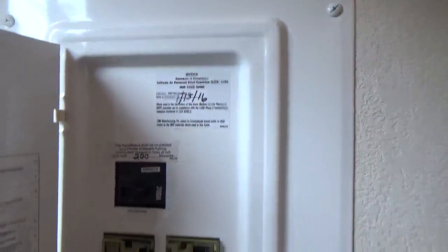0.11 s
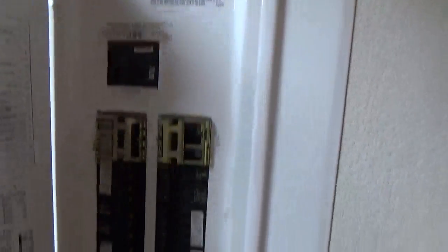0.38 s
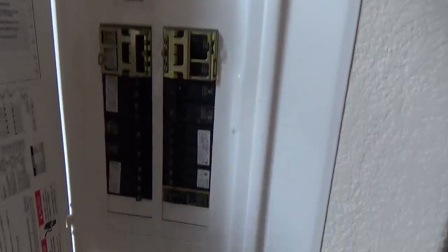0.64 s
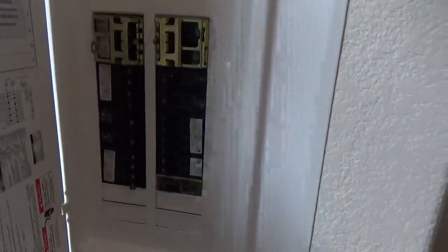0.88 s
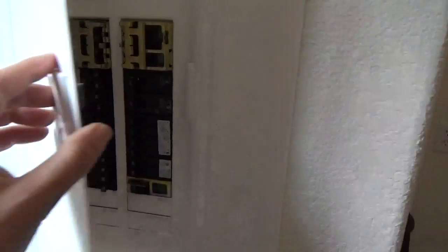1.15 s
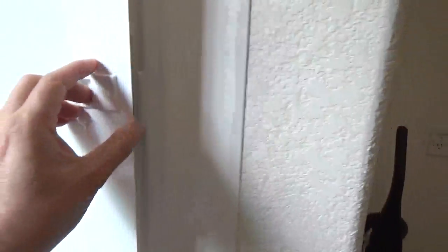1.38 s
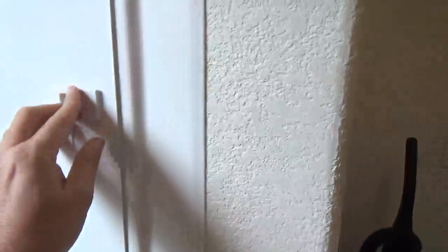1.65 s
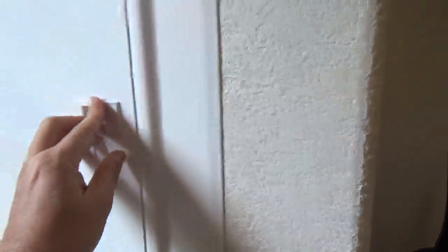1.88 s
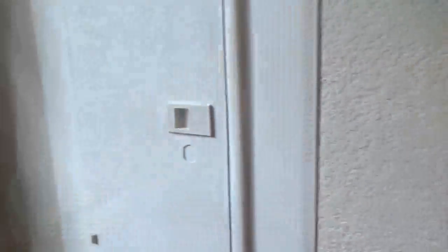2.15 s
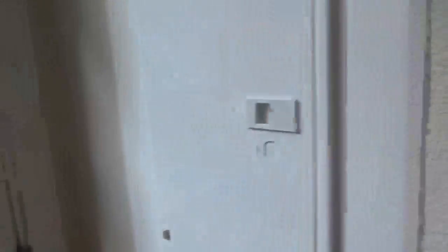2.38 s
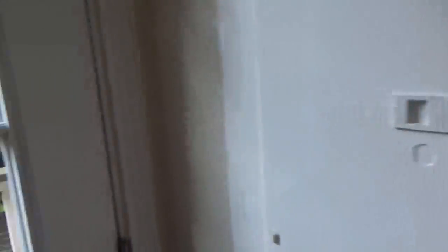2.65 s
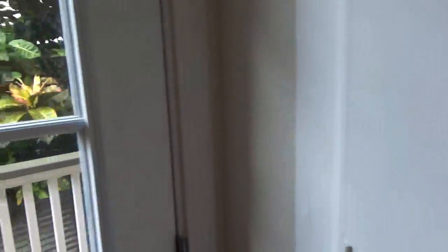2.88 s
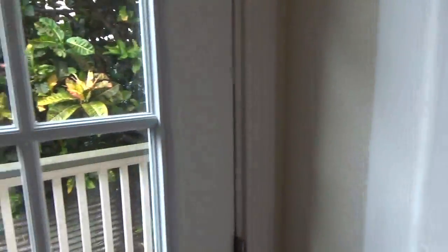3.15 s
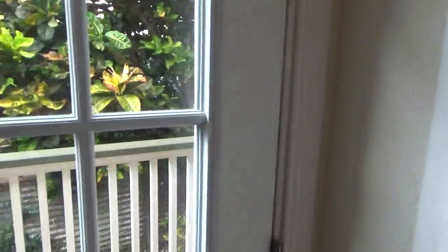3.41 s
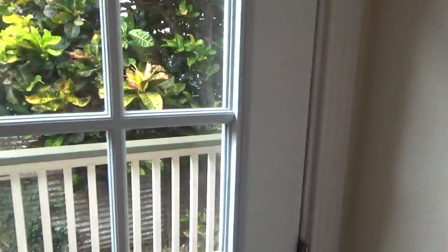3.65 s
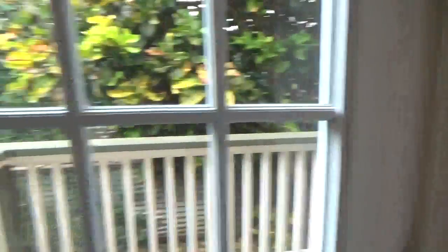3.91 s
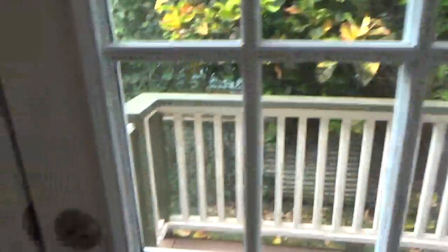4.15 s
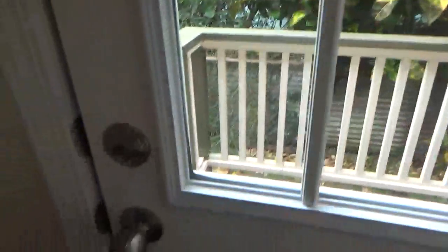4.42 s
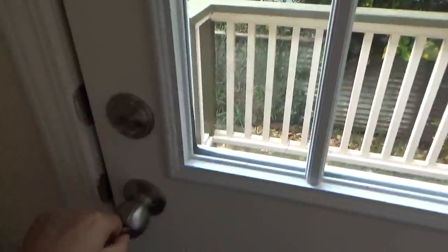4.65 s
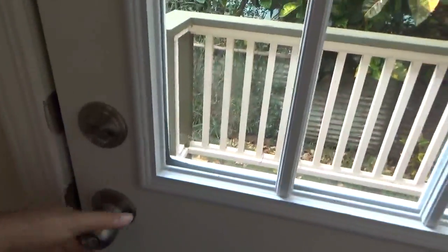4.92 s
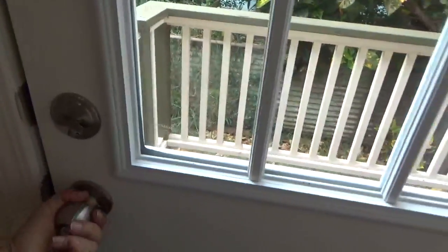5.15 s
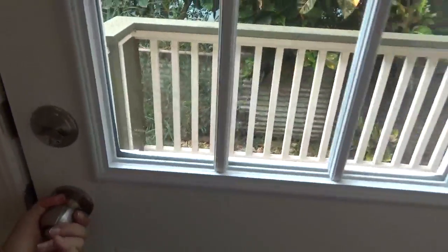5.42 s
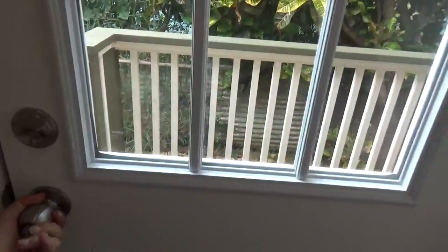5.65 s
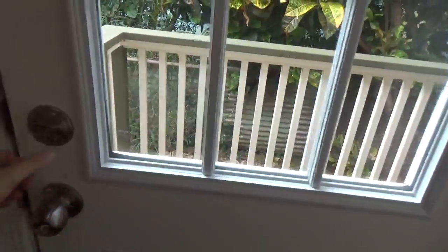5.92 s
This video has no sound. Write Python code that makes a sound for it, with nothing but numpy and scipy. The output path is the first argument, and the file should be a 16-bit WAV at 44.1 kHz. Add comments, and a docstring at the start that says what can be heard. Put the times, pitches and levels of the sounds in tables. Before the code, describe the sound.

A small hard-walled hall, heard close up in stereo with a short, bright room tail over low hiss, faint mains hum and rustling clothes. A tiny snap comes at 0.3 s, then a soft brushing and flexing of sheet metal around 0.9-1.3 s. From 1.55 to 2.0 s the panel's catch scrapes shut: rough rasp, short squeal, tinny clanks and snaps, slightly left. Rustle and very thin, faint squeaks follow at 2.4-2.7 s. Soft, irregular shoe slaps and scuffs on hard floor run from 2.7 to 4.05 s. At 4.25 s knob and latch begin ticking, clattering in clusters to 5.0 s, then a loud burst at 5.1-5.25 s with wooden thud, drag and shudder. A near-quiet gap holds a faint squeak at 5.35 s and a light click at 5.5 s. The loudest sharp clacks come at 5.7-5.85 s, with a brief scrape dying away by 6 s.

```python
"""Panel door, footsteps, latch

In a small hall a sheet-metal panel door is swung to and its catch scraped shut: rough slip noise and short
snaps excite the modes of the sheet. Feet shuffle to a wooden door as slaps and scuffs on a hard floor. Its knob
and latch click and clatter as the door is pulled and pushed: short blows ring metal and leaf, rubbing drags the
leaf. Thin squeaks are wavering sines; hard walls add early echoes and a short noise tail.
Mains hum, hiss and rustling clothes lie underneath."""
import sys
import numpy as np
from scipy import signal
from scipy.fft import rfft, irfft, next_fast_len
from scipy.io import wavfile
from scipy.ndimage import uniform_filter1d

SR = 44100
rng = np.random.default_rng(int(sys.argv[2]) if len(sys.argv) > 2 else 0)


def transcribe(signal):
    """Save signal, clipped to [-1, 1], as a 16-bit WAV file at the path in sys.argv[1]."""
    frames = np.atleast_2d(signal).T
    limited = np.clip(frames, -1, 1)
    pcm = np.round(limited * 32767).astype(np.int16)
    wavfile.write(sys.argv[1], SR, pcm)


def makeup_ratio(level_db):
    """Linear amplitude ratio for a level in decibels (20 dB per factor of ten)."""
    decades = np.asarray(level_db, float) / 20
    return 10 ** decades


N = 266364  # samples
T = np.arange(N) / SR  # s


def on_log(table, hz):
    """Read a (f/Hz, value) table along log frequency."""
    f, v = np.transpose(table)
    return np.interp(np.log(hz + 1), np.log(f), v)


def coloured(x, table):
    """Shape the spectrum of a signal by a (f/Hz, level/dB) table."""
    size = next_fast_len(x.shape[-1])
    hz = np.arange(size // 2 + 1) * SR / size
    return irfft(rfft(x, size) * makeup_ratio(on_log(table, hz)), size)[..., :x.shape[-1]]


def unit(x):
    """Scale to energy 1, so that a filter keeps the level of white noise."""
    return x / np.sqrt(np.sum(x ** 2))


def place(x, pan_db):
    """Pan mono to stereo by the level of left over right."""
    return x * makeup_ratio(np.array([[pan_db], [-pan_db]]) / 2)


def band(lo_hz, hi_hz):
    """Response of a broad band: the many close modes that blur together."""
    sos = signal.butter(2, [lo_hz, hi_hz], "band", fs=SR, output="sos")
    return unit(signal.sosfilt(sos, signal.unit_impulse(SR // 8)))


def ring(modes, blur=0.):
    """Response of decaying modes over a weighted broad band; little radiates far below the lowest mode."""
    hz, width, db = np.transpose(modes)[:, :, None]
    t = T[:SR // 8]
    decay = np.exp(-np.pi * width * t)  # a wider mode dies sooner
    out = np.sum(makeup_ratio(db) * width * decay * np.sin(2 * np.pi * hz * t), axis=0)
    out = signal.sosfilt(signal.butter(2, 0.77 * hz.min(), "high", fs=SR, output="sos"), out)
    return unit(unit(out) + blur)


def walk(rate):
    """Random levels held for 1 / rate s and smoothed twice, with a standard deviation of 1."""
    k = int(SR / rate)
    held = np.repeat(rng.standard_normal(N // k + 1), k)
    w = uniform_filter1d(uniform_filter1d(held, k), k)[:N]
    return w / w.std()


def grit(spread_db):
    """Contact force: a dense stream of tiny slips, a few much larger than the rest."""
    size = np.minimum(rng.exponential(size=N), 6.0)
    g = rng.standard_normal(N) * makeup_ratio(spread_db * size)
    return g / np.sqrt(np.mean(g ** 2))


def blows(columns, parts, rise_s, body_stretch, favour, spread_db):
    """Blows rise quickly and rattle out; the spot that is hit favours modes near its own pitch."""
    out, force = np.zeros(N + SR), grit(spread_db)
    t = T[:SR // 5]
    for s, db, click_hz, body_db, body_hz, sizzle_db, decay in np.broadcast(*columns):
        at = int(s * SR)
        grain = np.take(force, at + np.arange(len(t)), mode="wrap")
        decays = max(decay, .0005) * np.array([1, body_stretch, 1])  # the heavy body shakes on longer
        levels_db, pitches_hz = (0, body_db, sizzle_db), (click_hz, body_hz, None)
        for part, rel_db, hz, boost, fall in zip(parts, levels_db, pitches_hz, (*favour, 0), decays):
            if hz:
                peak = signal.lfilter(*signal.iirpeak(hz, 3.5, fs=SR), part)
                part = unit(part + boost * unit(peak))
            shape = (1 - np.exp(-t / rise_s)) * np.exp(-t / fall)
            y = signal.fftconvolve(shape * grain, part)
            # the blow's energy is set, its grain is chance
            y = makeup_ratio(db + rel_db) * np.sqrt(np.sum(shape ** 2)) * unit(y)
            out[at:at + len(y)] += y
    return out[:N]


def rubs(tables, shares, parts, tones_hz, spread_db):
    """Contact level and one control drive rough parts and wavering sines; the last sine has its own level."""
    force = np.zeros((len(parts) + len(tones_hz), N))
    for table in tables:
        s, db, control_db, last_db = np.transpose(table)
        eased_db = db.max() - db
        layers_db = [base + slope * control_db + lasting * eased_db for base, slope, lasting in shares]
        for layer, rel_db in enumerate(layers_db + [last_db]):
            force[layer] += makeup_ratio(np.interp(T, s, db + rel_db, left=-120, right=-120))
    rough = [signal.oaconvolve(f * grit(spread_db), r)[:N] for f, r in zip(force, parts)]
    soft = uniform_filter1d(force[len(parts):], SR // 100) * np.sqrt(2)
    tones = []
    for f, hz in zip(soft, tones_hz):
        level = f * makeup_ratio(2.1 * walk(70))
        wavering_hz = hz + 0.4 * np.sqrt(hz) * walk(40)
        tones.append(level * np.sin(2 * np.pi * np.cumsum(wavering_hz) / SR))
    return rough + tones


# catch snapping on the panel: (t/s, click level/dB, sheet/dB re click, sizzle/dB re click, rattle decay/s)
PANEL_SNAPS = [(0.2945, -52, -12, -6, .0012), (0.2998, -33.5, -21, -7, 0.0017),
               (1.054, -52.5, -8, 10, .0071), (1.13, -59, 0, 18, .006), (1.5554, -18, -15, -3, 0.0027),
               (1.563, -30, 1, 11.5, 0.014), (1.6317, -27, 9.5, 8.5, 0.016), (1.6976, -21, 5, -14, 0.0052),
               (1.7178, -19, -16, 11, .001), (1.745, -21, -28, 3.5, 0.014),
               (1.7947, -24, -0.5, -13, 0.0034), (2.001, -39, 3, -15, 0.0044)]
# panel swung to, then catch scraped shut and settling:
# (t/s, rasp level/dB, squeal/dB re rasp, flexing/dB re rasp)
PANEL_SCRAPES = [
    [(0.93, -62.5, -10, -6), (1.068, -57, -7, 5), (1.158, -59.5, -1, 15.5), (1.19, -58.5, -6, 8),
     (1.226, -58, -6, 17), (1.33, -68.5, -6, -3.5)],
    [(1.555, -42, -18, -16), (1.575, -28.5, 9, -6), (1.623, -28, -0.5, 1), (1.681, -32, 3, 11),
     (1.703, -26.5, 0, -7), (1.72, -29, 4.5, 3), (1.742, -23, -4.5, -22), (1.792, -19.5, -10, -4.5),
     (1.844, -27, -1.5, -18), (1.878, -37.5, 1, -12), (1.92, -44, -7, -12), (1.98, -53.5, -4, -8),
     (2.0, -43, -4, -2), (2.058, -55, -3.5, 8), (2.126, -62, -18, 0), (2.2, -77.5, 0, 1)],
]
# layers that the squeal wakes, in rows: rasp, sheet, sizzle, clank, three singing modes
# (level/dB re rasp, slope/dB per dB of squeal, slope/dB per dB that the contact eases)
PANEL_LAYERS = [(-0.5, 0, 0), (-5, 0.4, 0.0516), (0, 0.91, -0.0136), (-3, 0.05, 0.2947), (-2, 1, -0.17),
                (-11, 0.95, -0.0223), (-13, 0.5, 0.3166)]
# modes of the sheet: (f/Hz, width/Hz, level/dB)
SHEET_MODES = [(347, 48, -13), (606, 31, -11), (720, 116, 8.5), (1186, 30, 5.5), (1287, 58, 5)]
# modes of the catch's bright ring: (f/Hz, width/Hz, level/dB)
CATCH_MODES = [(1840, 100, 19.3), (2330, 120, 16), (2423, 110, 14), (3350, 210, 5.4), (4640, 100, 10),
               (5400, 280, 11), (5800, 53, 14)]
# modes that the scraping catch sets singing: (f/Hz)
SINGING_MODES = [721, 1245, 6440]


def panel():
    """Sheet-metal door: the catch scrapes and snaps, the sheet rings, sings and flexes."""
    catch_hz, sheet_hz, flex_hz = 2530, 680, 169.7  # modes nearest the catch; flexing of the sheet
    catch_seats_s, seated_db = 1.71, -18
    catch = ring(CATCH_MODES, 3.1 * band(960, 6000))
    sheet = ring(SHEET_MODES, 0.11 * band(170, 1050))
    parts = catch, sheet, band(8560, 12640)
    rasp, body, sizzle, clank, *sing, flex = rubs(
        PANEL_SCRAPES, PANEL_LAYERS, (*parts, band(120, 860)), [*SINGING_MODES, flex_hz], spread_db=3.5)
    # once the catch seats, it damps the highest singing mode
    sing[-1] = sing[-1] * np.where(T < catch_seats_s, 1, makeup_ratio(seated_db))
    s, db, sheet_db, sizzle_db, decay = np.transpose(PANEL_SNAPS)
    snaps = blows((s, db, catch_hz, sheet_db, sheet_hz, sizzle_db, decay), parts,
                  rise_s=0.00021, body_stretch=1.95, favour=(1.9, .6), spread_db=4.0)
    # the wide sheet hangs to the left of the catch
    return place(rasp + sizzle + snaps, 1.6) + place(body + clank + sum(sing), 3.9) + place(flex, 3.5)


# knob and latch: (t/s, click level/dB, click f/Hz, leaf/dB re click, sizzle/dB re click)
LATCH_CLICKS = [(4.2633, -35.5, 1410, -7, -2.5), (4.368, -39, 3500, 2, -4), (4.3819, -27, 3580, -12.5, 2.5),
                (4.4, -30.5, 1380, -16, -11), (4.502, -36, 1750, -11, -14), (4.5098, -31, 1850, -22, -11),
                (4.516, -29, 1400, -14.5, -10), (4.5505, -29, 3030, -21, -10),
                (4.5564, -26.5, 1510, -7.5, -1), (4.5663, -20.5, 3450, -14.5, 2.5),
                (4.585, -51, 1400, 0, -13), (4.6464, -47, 3520, -7, -7), (4.7255, -31.5, 2590, -12, 3.5),
                (4.7323, -16.5, 2960, -19, -4.5), (4.737, -34, 2390, 1.3, -14.5),
                (4.809, -27, 3960, -10.5, -7), (4.968, -35, 2000, -3, -0.5),
                (4.975, -17.5, 2240, -31, -0.5), (4.9795, -17.5, 4030, -5, -0.5),
                (4.987, -22.5, 3860, -21, 4), (5.0718, -23.5, 1880, -8.5, -7),
                (5.116, -26.5, 1640, -24, -12), (5.127, -23, 1610, -6.5, -2), (5.139, -13, 1670, -8, -4),
                (5.502, -26.5, 1700, -13, -2), (5.5598, -43.5, 1840, -1, 4),
                (5.7212, -21, 3570, -37.5, -10), (5.7254, -17, 3000, -23, -13),
                (5.7294, -22, 3570, -13, -3.5), (5.734, -25, 1440, -34, -12),
                (5.7777, -16.5, 3300, -33, -7.5), (5.7832, -18, 3500, -28, -3.5),
                (5.7975, -12.5, 1670, -19, -6.5), (5.8034, -12, 1700, -20, -16),
                (5.8338, -11.5, 5220, -24, -6.5), (5.847, -25.5, 1920, 1, -11)]
# latch spring ticking, short: (t/s, click level/dB, click f/Hz, sizzle/dB re click)
SPRING_CLICKS = [(4.9305, -27.5, 2380, -6.5), (5.1125, -37, 5200, 5), (5.134, -14, 3000, -3),
                 (5.1618, -7.5, 3600, -20), (5.1757, -10, 3900, -18), (5.2607, -17.5, 4400, -9),
                 (5.714, -37.5, 4200, -2)]
# door dragging in its frame, pulled, then pushed:
# (t/s, rasp level/dB, swing of the leaf/dB re rasp, shudder/dB re rasp)
DOOR_DRAGS = [
    [(5.11, -42.5, 5, -7), (5.136, -25, -15, -25), (5.168, -26.5, -2, -13), (5.188, -31, -4, 6.5),
     (5.215, -30, 1, 7), (5.24, -42.5, 4, 9), (5.288, -47.5, 12, 3), (5.344, -52, -5, -12),
     (5.384, -63, 4, -13), (5.412, -56, 6, -5.5), (5.48, -62, -2, -6)],
    [(5.775, -43, -54, -30), (5.811, -22, -50, -30), (5.83, -23.5, -45, -22), (5.85, -27, -46, -9),
     (5.875, -31.5, -47, -14), (5.9, -47, -32, -11), (5.918, -46, -28, -11), (5.976, -62, -30, -4),
     (6.03, -64, -28, -5)],
]
# layers that the swing wakes, in rows: rasp, leaf, sizzle, rumble, air thump
# (level/dB re rasp, slope/dB per dB of swing, slope/dB per dB that the contact eases)
DOOR_LAYERS = [(-2, 0, 0), (3, 0.05, 0.0837), (-8.5, -0.06, 0.17), (3, 0.75, -0.13), (-3, 1.5, 0.27)]
# modes of the wooden leaf: (f/Hz, width/Hz, level/dB)
LEAF_MODES = [(167, 5.8, 0), (291, 21, 8.5), (400.4, 17, 7), (390, 570, 1), (900, 420, -1.5)]
# modes of the metal latch: (f/Hz, width/Hz, level/dB)
LATCH_MODES = [(1595, 490, 16.5), (2630, 340, -32), (3300, 48, -10), (3986, 150, 9), (5220, 660, 6.5)]


def door():
    """Knob and latch tick and clatter into the wooden leaf, which drags, shudders and pushes air."""
    thump_hz, shudder_hz = 21.9, 155  # air and leaf
    leaf_per_click = .21  # a harder contact wakes higher modes in latch and leaf alike
    latch_rattle_s, tick_rattle_s, tick_leaf_db = .0038, .0012, -16.5
    latch = ring(LATCH_MODES, 2.45 * band(1250, 4380))
    leaf = ring(LEAF_MODES, 1.3 * band(70, 1230))
    parts = latch, leaf, band(7000, 13800)
    *drag, rumble, thump, shudder = rubs(
        DOOR_DRAGS, DOOR_LAYERS, (*parts, band(52, 106)), [thump_hz, shudder_hz], spread_db=3.0)
    s, db, click_hz, leaf_db, sizzle_db = np.transpose(LATCH_CLICKS)
    clatter = blows((s, db, click_hz, leaf_db, leaf_per_click * click_hz, sizzle_db, latch_rattle_s), parts,
                    rise_s=0.00012, body_stretch=7.74, favour=(.4, .45), spread_db=3.0)
    s, db, click_hz, sizzle_db = np.transpose(SPRING_CLICKS)
    ticks = blows((s, db, click_hz, tick_leaf_db, leaf_per_click * click_hz, sizzle_db, tick_rattle_s), parts,
                  rise_s=0.0001, body_stretch=11.5, favour=(.9, .3), spread_db=3.0)
    near_latch = place(clatter + ticks + sum(drag), 1.4)
    return near_latch + place(shudder, 9.4) + place(rumble, 3.6) + place(thump, 3.5)


# soles on the floor: (t/s, slap level/dB, floor/dB re slap, floor f/Hz, scuff decay/s)
SOLE_SLAPS = [(2.69, -54.5, 9, 100, 0.039), (2.7327, -29.5, -2.5, 656, 0.0063),
              (2.7478, -33, -7, 1120, 0.0053), (2.8207, -38.5, -2, 99, 0.019),
              (2.833, -30, -7.5, 680, 0.015), (2.8466, -25, 4, 1150, 0.0049),
              (2.983, -34.5, -18, 1110, 0.015), (3.1166, -40, 1, 544, .023),
              (3.1625, -31.5, -3.5, 620, 0.0091), (3.1734, -37, 4.5, 600, 0.016),
              (3.196, -32, -4, 352, 0.011), (3.22, -28.5, -19, 584, 0.0021), (3.317, -54, -9, 279, 0.014),
              (3.349, -36, -38, 554, 0.0082), (3.3534, -27, -2, 660, 0.017),
              (3.3886, -27.5, -7.5, 820, 0.0066), (3.403, -32, -11, 810, 0.029),
              (3.4384, -36, -11, 555, 0.017), (3.5166, -42.5, 4, 376, 0.0056),
              (3.561, -31.5, -12, 465, 0.0046), (3.575, -33, -6, 995, .012),
              (3.6662, -45, 6.5, 297, 0.0067), (3.711, -34.5, 2.5, 275, 0.0081),
              (3.7628, -41, 6.5, 487, 0.0074), (3.777, -32.5, -10, 293, 0.0037),
              (3.8072, -51, 7, 387, 0.022), (3.8255, -34.5, -7, 670, 0.0057),
              (3.852, -24.5, -3.5, 920, 0.0082), (3.8717, -34, -11, 945, 0.031),
              (3.924, -43.5, -0.5, 860, 0.019), (3.94, -41, -10, 900, .005),
              (3.9958, -34.5, -0.5, 218, 0.0051), (4.045, -49, 6.5, 302, 0.005)]
# modes of the floor: (f/Hz, width/Hz, level/dB)
FLOOR_MODES = [(165, 110, 11), (294, 110, 3.7), (550, 76, 1.5), (1110, 310, 7.5), (1530, 19, 2.3)]
# modes of the soles: (f/Hz, width/Hz, level/dB)
SOLE_MODES = [(2400, 260, 48), (3000, 74, 16), (3970, 61, -2), (5040, 21, -9), (6350, 150, 40.5)]


def steps():
    """Soles slap and scuff on a hard floor; first, louder and longer contacts sizzle more."""
    heel_hz, sole_hz = 3300, 1360
    sole = ring(SOLE_MODES, 4.4 * band(1030, 5670))
    floor = ring(FLOOR_MODES, 3.1 * band(65, 1620))
    parts = sole, floor, band(3100, 14600)
    s, db, floor_db, floor_hz, decay = np.transpose(SOLE_SLAPS)
    heel = np.diff(s, prepend=0) > .03  # first contact after a pause (s) is harder
    sizzle_db = -8 + 3.5 * heel
    sizzle_db = sizzle_db + 0.9446 * (db - db.mean())  # dB per dB of slap
    sizzle_db = sizzle_db + 0.02 * (floor_db - floor_db.mean())  # dB per dB of floor
    sizzle_db = sizzle_db + 2 * np.log2(decay / decay.mean())  # dB per doubling of the scuff
    click_hz = np.where(heel, heel_hz, sole_hz)
    slaps = blows((s, db, click_hz, floor_db, floor_hz, sizzle_db, decay), parts,
                  rise_s=0.00083, body_stretch=2.64, favour=(.7, .75), spread_db=1.5)
    return place(slaps, 1.0)


# thin squeaks, one table each: (t/s, f/Hz, level/dB)
SQUEAK_GLIDES = [
    [(2.375, 10300, -58), (2.39, 10500, -51), (2.43, 10700, -64)],
    [(2.43, 3230, -69), (2.49, 3200, -58), (2.58, 3150, -69), (2.68, 3100, -56)],
    [(5.345, 3200, -66), (5.36, 3170, -59), (5.41, 3150, -67)],
]


def squeaks():
    """A thin, faint, broken tone: a gliding sine under fast random modulation, a narrow band of noise."""
    out = 0
    for table in SQUEAK_GLIDES:
        s, hz, db = np.transpose(table)
        phase = 2 * np.pi * np.cumsum(np.interp(T, s, hz)) / SR
        level = makeup_ratio(np.interp(T, s, db, left=-120, right=-120) + 1.2 * walk(30))
        out = out + level * walk(250) * np.sin(phase)
    return out


# first echoes from near walls: (t/ms, left level/dB, right level/dB)
WALL_ECHOES = [(1.9, -16.5, -89), (3.1, -103, -17), (4.7, -19, -72), (6.6, -59, -15), (9.2, -22, -22.5)]


def near_walls(x):
    """Add the first echoes, delayed copies that reach left and right unequally."""
    out = x.copy()
    for ms, *db in WALL_ECHOES:
        lag = int(ms * SR / 1000)
        out[:, lag:] += makeup_ratio(np.array(db))[:, None] * x.mean(axis=0)[:-lag]
    return out


# time for the hall to die away by 60 dB: (f/Hz, T60/s)
HALL_T60 = [(300, 0.32), (1000, 0.33), (4000, 0.32), (10000, 0.31)]


def room(x):
    """Diffuse tail: bands of decaying noise, partly shared between left and right."""
    t, tail = T[:SR], 0
    for hz in 200 * 2 ** np.arange(0, 6, .5):  # a small hall returns little deep bass
        sos = signal.butter(2, [hz / 1.366, hz * 1.323], "band", fs=SR, output="sos")
        noise = signal.sosfilt(sos, rng.standard_normal((2, SR)))
        tail = tail + noise * np.exp(-np.log(1000) * t / on_log(HALL_T60, hz))
    shared = .5 * np.sum(tail, axis=0)  # close microphones hear much of the tail alike
    tail = (tail + 0.89 * shared) * (1 - np.exp(-t / 0.00083))
    return signal.oaconvolve(x, unit(tail) * np.sqrt(2), axes=1)[:, :N]


def wide_noise(colour, side):
    """Coloured noise of rms 1 with a share that differs left and right."""
    mid, other = rng.standard_normal((2, N))
    x = coloured(mid + side * other * np.array([[1], [-1]]), colour)
    return x / np.sqrt(np.mean(x ** 2))


# spectrum of the hiss: (f/Hz, relative level/dB per Hz)
HISS_COLOUR = [(12, -50), (20, 4), (43, -11), (86, -9.5), (110, -13), (243, -7), (264, -10.5), (293, -4.5),
               (473, -11.5), (555, -16), (634, -13), (920, -21.5), (10600, -32.5), (11500, -45),
               (15000, -75), (22000, -120)]
# clothes and hands moving: (t/s, level/dB)
RUSTLE_LEVEL = [(0.0, -58), (0.32, -57.5), (0.65, -61), (0.96, -63.5), (1.12, -53.5), (1.53, -56),
                (2.0, -57), (2.156, -50), (2.27, -54.5), (2.4, -51), (2.5, -54.5), (2.7, -55),
                (4.05, -53.5), (4.25, -56.5)]
# spectrum of the rustle: (f/Hz, relative level/dB per Hz)
CLOTH_COLOUR = [(88, -41), (150, -2), (299, -33), (516, 3), (554, -34), (702, 2), (7040, -12.5),
                (10500, -9), (11500, -18), (15000, -55), (22000, -120)]


def background():
    """Steady hiss, a mains hum of wavering level, and rustle that comes with movement."""
    hiss_db, hum_db, hum_hz = -54.5, -59, 120
    hiss = makeup_ratio(hiss_db) * wide_noise(HISS_COLOUR, 0.19)
    hum = makeup_ratio(hum_db + 0.46 * walk(6.8)) * np.sin(2 * np.pi * hum_hz * T)
    rustle_db = np.interp(T, *np.transpose(RUSTLE_LEVEL)) + 0.13 * walk(24.2)
    rustle = makeup_ratio(rustle_db) * wide_noise(CLOTH_COLOUR, 0.67)
    return hiss + hum + rustle


def scene():
    """Everything struck or rubbed sounds in the hall, over the background."""
    room_db = -6.5
    near = panel() + door() + steps() + squeaks()
    return near_walls(near) + makeup_ratio(room_db) * room(near) + background()


def low_pass(x):
    """Removes everything above the highest recorded frequency."""
    return signal.sosfilt(signal.butter(12, 12170, fs=SR, output="sos"), x)


def record(dry):
    """Round the peaks softly, thin the deep bass and cut the top steeply."""
    low_hz, top_hz = 42, 11150
    x = np.tanh(1.41 * dry) / 1.395
    x = signal.sosfilt(signal.butter(2, low_hz, "high", fs=SR, output="sos"), x)
    x = signal.sosfilt(signal.ellip(10, .3, 60, top_hz, fs=SR, output="sos"), x)
    return low_pass(x)


dry = scene()
out = record(dry)
transcribe(out)
```